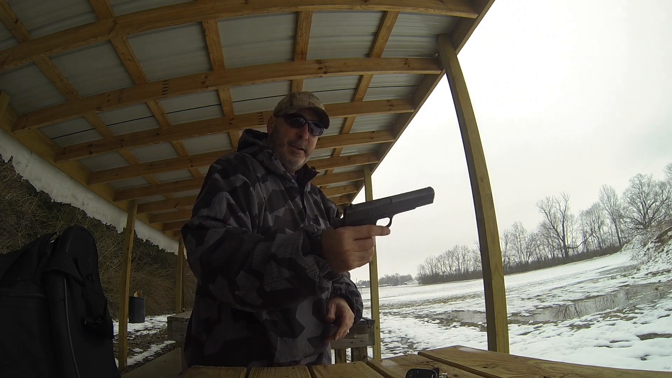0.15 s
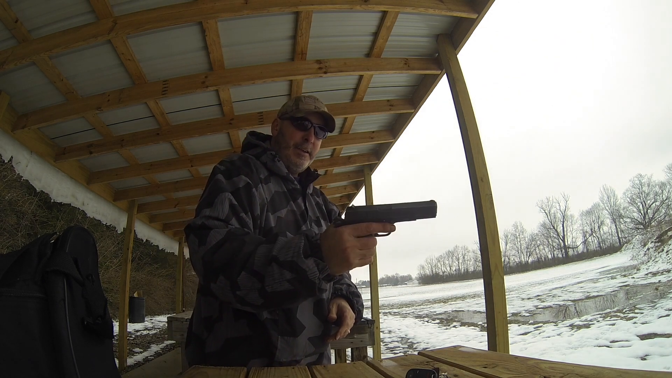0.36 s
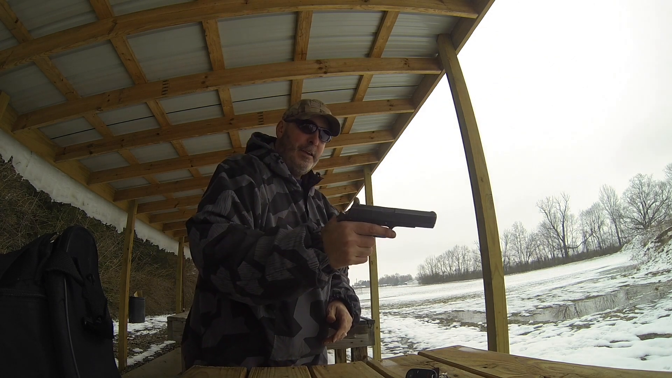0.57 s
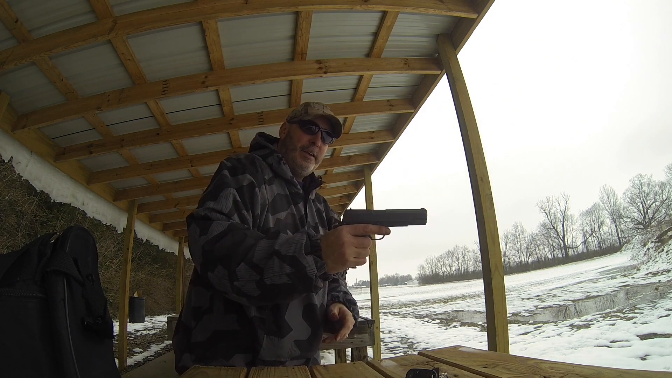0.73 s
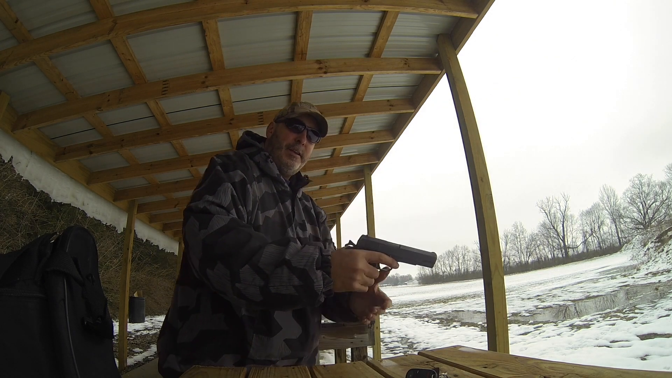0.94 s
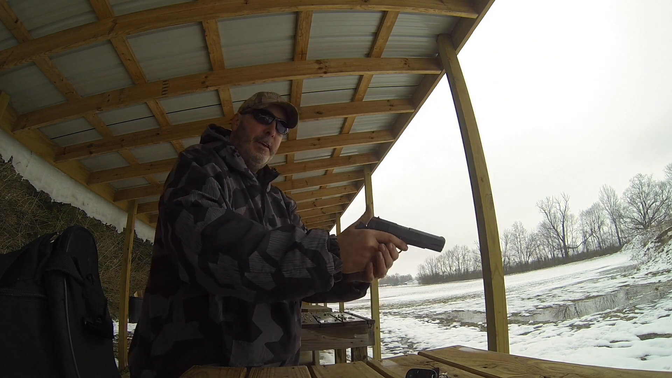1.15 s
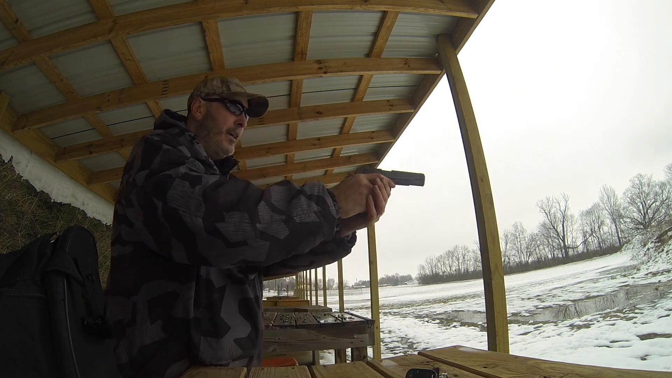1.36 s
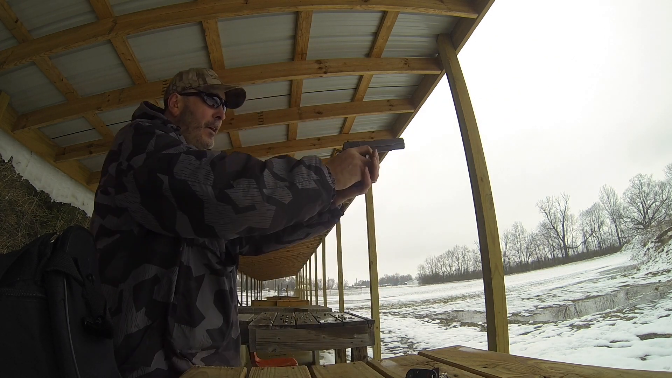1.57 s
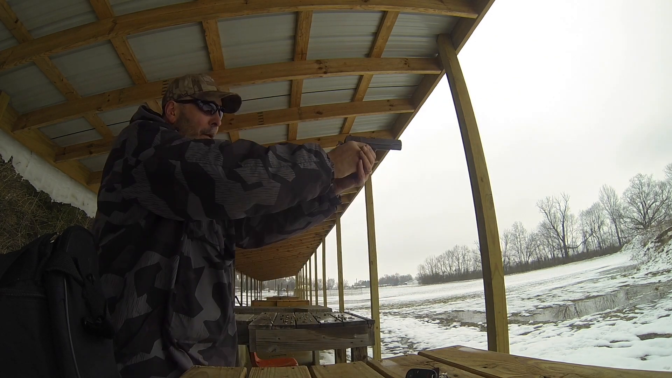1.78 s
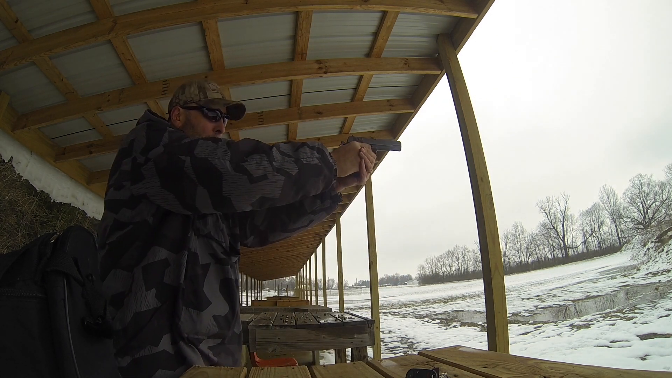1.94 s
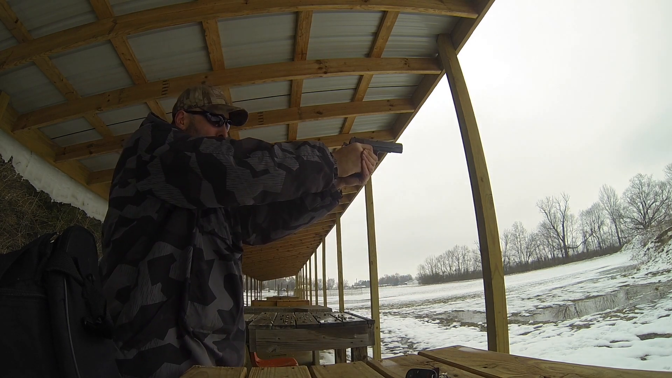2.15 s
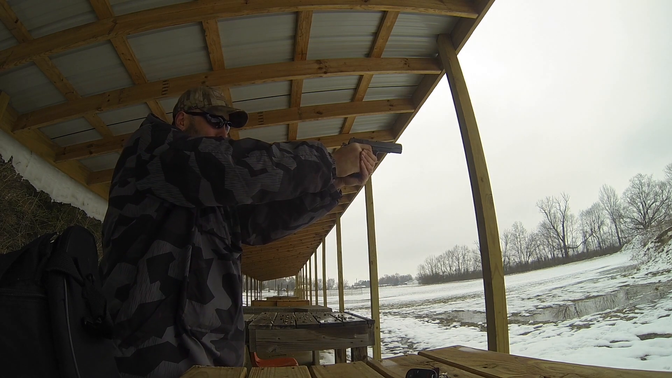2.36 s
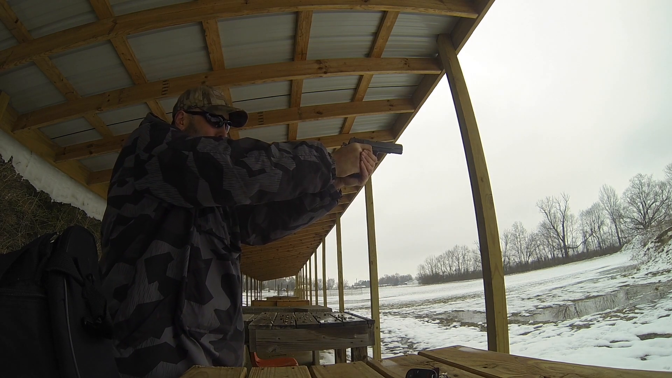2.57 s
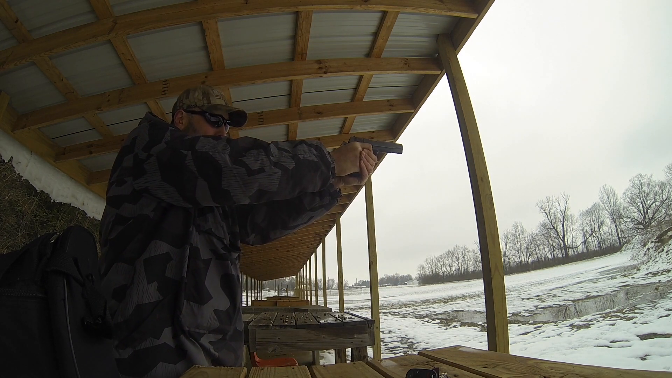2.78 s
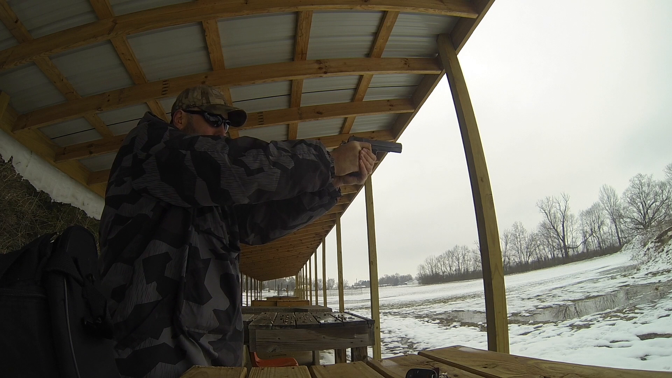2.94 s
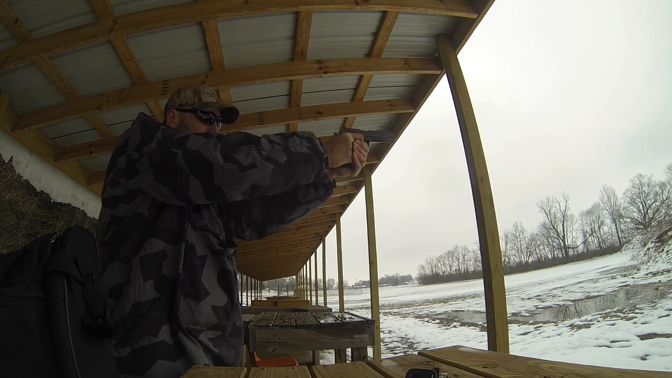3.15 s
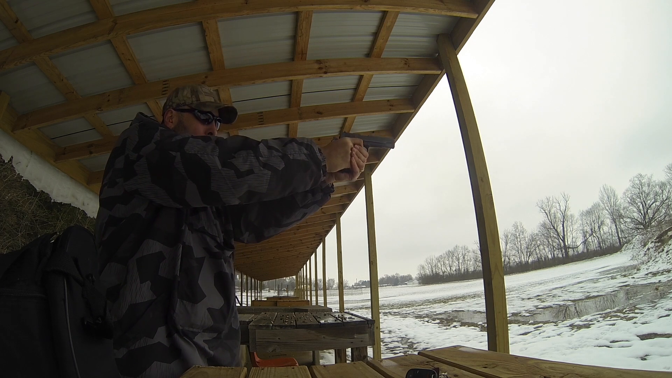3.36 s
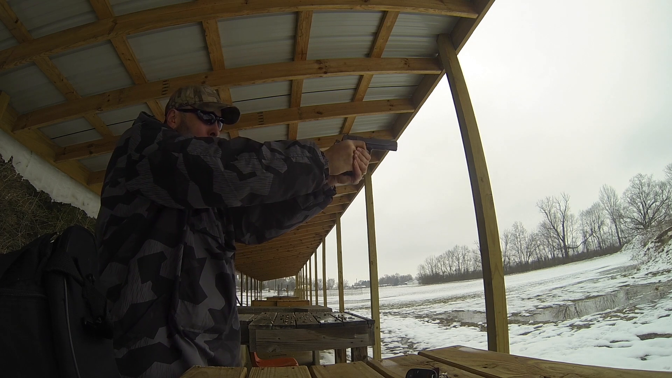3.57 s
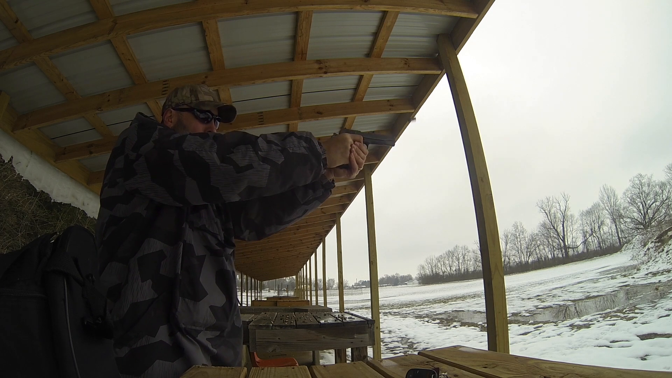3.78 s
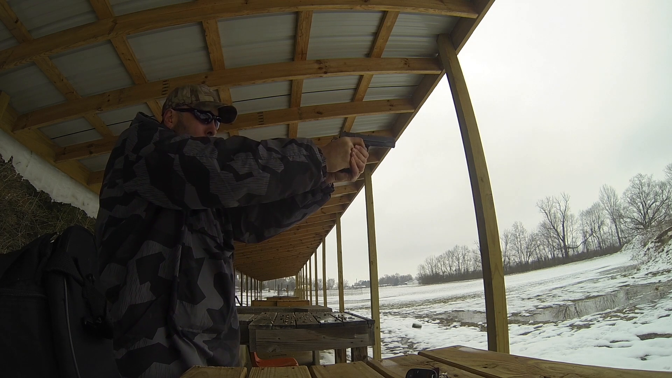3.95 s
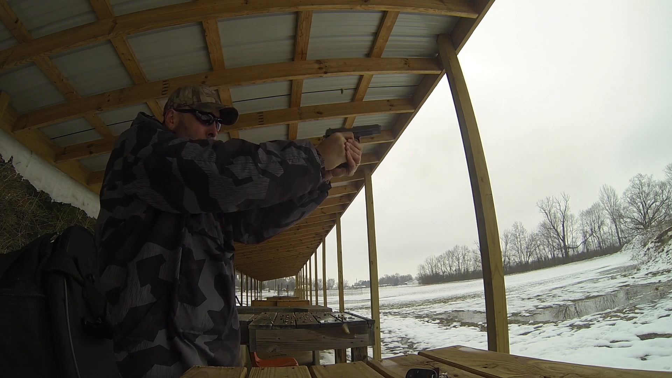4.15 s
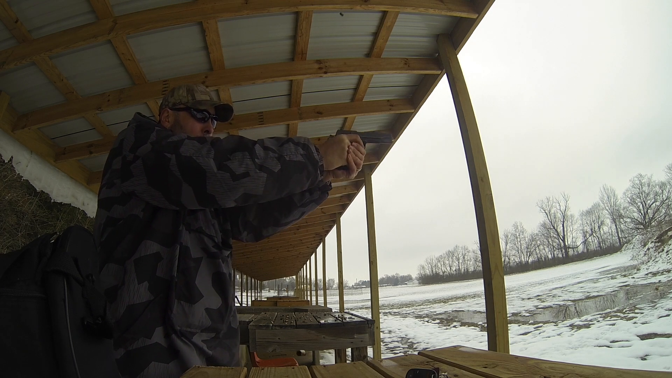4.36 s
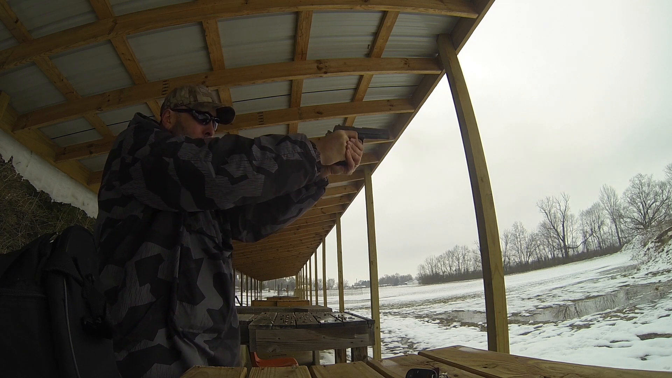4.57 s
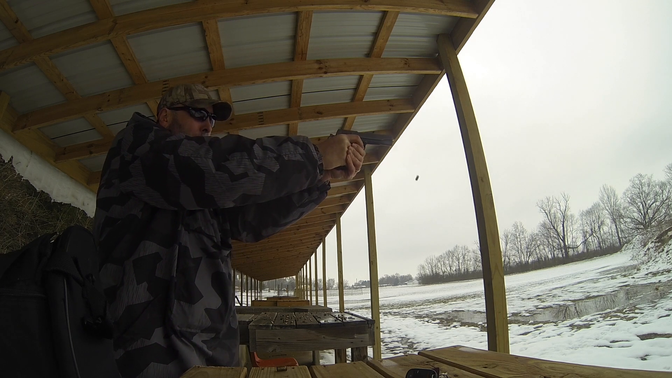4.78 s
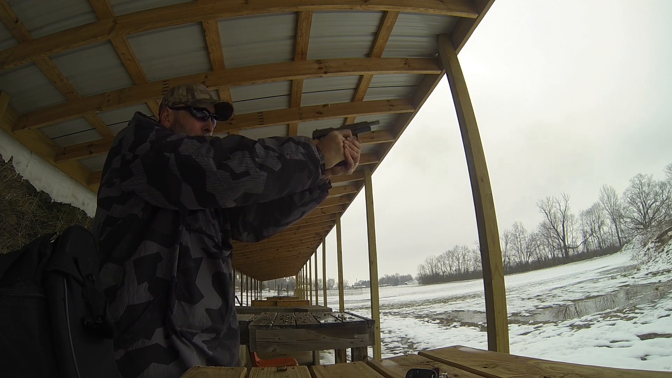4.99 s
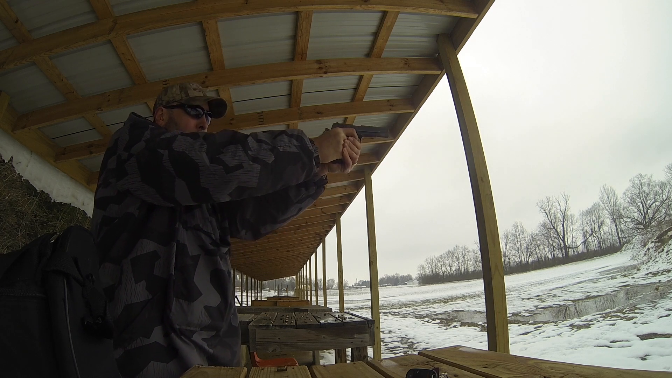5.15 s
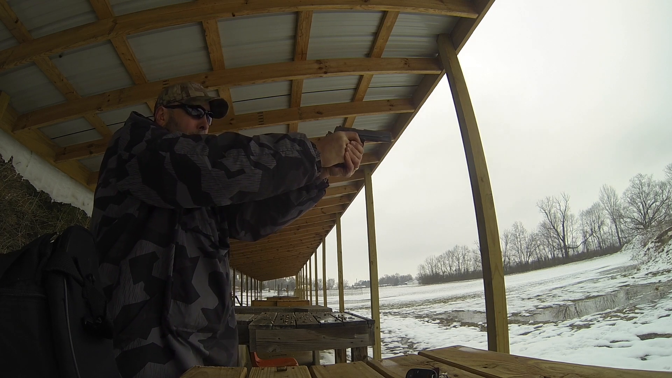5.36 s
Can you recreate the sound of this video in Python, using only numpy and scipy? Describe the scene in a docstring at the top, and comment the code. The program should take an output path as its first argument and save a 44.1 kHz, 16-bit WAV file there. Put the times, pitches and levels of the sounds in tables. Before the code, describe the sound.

A pistol's slide snaps shut with a steel clack, a small catch clicks, and a wooden bench takes a low bump. After a short pause, five loud shots follow in quick succession, each overloading the close microphone and echoing off a shelter roof and distant trees. Spent cases knock on the bench and tinkle faintly on the floor. A faint hiss and electronic ticking sit underneath.

```python
"""A pistol fires five shots under the wooden roof of a snowy outdoor range. First its slide clacks shut, a
catch clicks, the bench is bumped and sleeves rustle. Each blast rings and overloads a camera on the bench; the
shelter and the far trees echo it. Spent cases knock on the bench and tinkle on the floor. The shots make the
camera turn everything down, even its own hiss and whine and the steady ticking."""
import sys
import numpy as np
from scipy import signal
from scipy.fft import rfft, irfft, next_fast_len
from scipy.io import wavfile
from scipy.ndimage import uniform_filter1d, map_coordinates

SR = 44100
rng = np.random.default_rng(int(sys.argv[2]) if len(sys.argv) > 2 else 0)


def store_pcm(level_fs):
    """Save levels as 16-bit WAV."""
    pcm = np.round(np.clip(level_fs, -1, 1) * 32767).astype(np.int16)
    wavfile.write(sys.argv[1], SR, np.atleast_2d(pcm).T)


N = 239011
TIME = np.arange(N) / SR


def amp(db):
    """Turn decibels (dB) into a gain."""
    return 10 ** (np.asarray(db) / 20)


def unit(x):
    """Scale a sound to an average (rms) level of 1."""
    return x / np.sqrt(np.mean(x ** 2) + 1e-20)


def along(points, hz):
    """Read between (Hz, value) points on a log scale of pitch."""
    pitches, values = np.transpose(points)
    return np.interp(np.log(hz + 1), np.log(pitches + 1), values)


def filtered(x, response):
    """Multiply each frequency f in a sound by response(f)."""
    size = next_fast_len(len(x) + SR // 4)
    return irfft(rfft(x, size) * response(np.fft.rfftfreq(size, 1 / SR)), size)[:len(x)]


def resonances(table, f):
    """The response of an object that rings at the (Hz, width, dB) peaks given."""
    return sum(amp(db) * 1j * f * width / (hz * hz - f * f + 1j * f * width) for hz, width, db in table)


def noise(spectrum, size):
    """Noise of level 1, coloured by (Hz, dB) points."""
    return unit(filtered(rng.standard_normal(size), lambda f: amp(along(spectrum, f))))


def wobble(size, rate):
    """A smooth curve through `rate` random values a second."""
    return map_coordinates(rng.standard_normal(int(size * rate / SR) + 4), [np.arange(size) * rate / SR])


def fade(t, t60):
    """A gain that holds until time 0, then falls 60 dB every t60 seconds."""
    return amp(-60 * np.maximum(t, 0) / t60)


def add(track, start, sound):
    """Mix a sound into the track, `start` seconds in."""
    part = track[max(round(start * SR), 0):][:len(sound)]
    part += sound[:len(part)]


# The colour of the hiss. Each row: frequency in Hz, level in dB.
HISS = [(20, -3.5), (60, 0.5), (130, -6), (250, -11.5), (500, -17.5), (1000, -20.5), (2200, -24.5),
        (3000, -23), (4400, -30.5), (7500, -33.5), (11500, -38.5), (15000, -39.5)]
# Thin, steady tones. Each row: pitch in Hz, average level in dB.
WHINE = [(2589, -72.5), (10643, -86), (10691, -69), (13189, -86.5)]
def background():
    """Quiet air and hiss; the camera's electronics whine and chirp, and a faint tick repeats about ten times a
    second."""
    whine = sum(amp(db) * np.sqrt(2) * np.sin(2 * np.pi * hz * TIME) for hz, db in WHINE)
    chirps = np.zeros(N)
    for hz, db, lag in [(5020, -59.5, 0), (5490, -63, 0.32)]:
        pulse = np.cos(np.pi * (48 * TIME - lag)) ** 8  # the tones take turns, 48 times a second
        chirps += amp(db) * pulse * np.sin(2 * np.pi * hz * TIME + 2 * wobble(N, rate=99))
    tick_gap_s = .1024
    from_tick = (TIME - .0765 + tick_gap_s / 2) % tick_gap_s - tick_gap_s / 2
    ticks = -amp(-34) * np.exp(-np.abs(from_tick) / .0012)
    hiss = amp(-49.5) * filtered(noise(HISS, N), lambda f: f < 15300)
    return hiss + whine + chirps + ticks


def steel_snaps(contacts, body, echo_db, echo_t60, dull_hz):
    """Steel parts meet: a gritty burst rings the part and echoes off the roof."""
    out, t = np.zeros(N), TIME[:SR // 2]
    # small parts give off no bass, and the highest treble is soft
    band = lambda f: f ** 4 / (f ** 4 + 1300 ** 4) / (1 + (f / dull_hz) ** 8)
    for start, db, t60, tilt_db in contacts:
        colour = lambda f: resonances(body, f) * amp(tilt_db * np.log2(f + 1)) * band(f)
        grit = unit(filtered(rng.standard_normal(len(t)), colour))
        echo = amp(echo_db) * fade(t, echo_t60) * (1 - np.exp(-t / 0.0029))
        add(out, start, amp(db) * grit * np.hypot(fade(t, t60), echo))
    return out


# The slide's hits. Each row: start in seconds, level in dB, fade time in seconds,
# brightness in dB per octave.
SLIDE_HITS = [(.0025, -19, 0.039, -11.5), (.0112, -16, 0.081, -5), (.0195, -7.5, 0.033, -4),
              (.0305, -7, 0.064, -1.5)]
# How the slide rings. Each row: pitch in Hz, width in Hz, level in dB.
SLIDE_TONES = [(1664, 84, 1), (2430, 210, -4), (2680, 110, -2.5), (3200, 430, -0.5), (3860, 140, -8.5),
               (4640, 210, 4), (5060, 130, -4.5), (7100, 230, 4.5), (8270, 380, -10.5), (9450, 220, -6),
               (13200, 1100, -24.5)]
def slide():
    """The pistol's slide runs forward and slams shut."""
    return steel_snaps(SLIDE_HITS, SLIDE_TONES, echo_db=-11, echo_t60=0.17, dull_hz=14140)


# The catch's hits. Each row: start in seconds, level in dB, fade time in seconds,
# brightness in dB per octave.
CATCH_HITS = [(.5603, -21, 0.014, -2.5), (.5668, -40, .03, 7), (.6625, -45.5, 0.025, -5)]
# How the catch rings. Each row: pitch in Hz, width in Hz, level in dB.
CATCH_TONES = [(2730, 270, -6), (3160, 340, 3), (5130, 700, -6.5), (6780, 270, 3.5), (7100, 60, -6),
               (8550, 450, -21), (11000, 500, -12), (13400, 1000, -6)]
def catch():
    """A small steel catch clicks on the pistol."""
    return steel_snaps(CATCH_HITS, CATCH_TONES, echo_db=-20, echo_t60=0.14, dull_hz=15000)


SWAY_HZ, SWAY_T60 = 72.5, 0.44  # the bench's lowest note and its fade time in seconds
# How loose boards rattle. Each row: pitch in Hz, width in Hz, level in dB.
BOARD_TONES = [(1040, 50, 9), (1190, 60, 8.5), (1555, 93, 7.5), (1620, 33, -6)]
def bench_bump():
    """The bench sways more while it is pushed, then settles; loose boards buzz along."""
    start, push_s = 1.286, .05
    t = TIME - start
    growth_db = 14.5 * np.minimum(t / push_s - 1, 0)
    level = (t > 0) * amp(-19 + growth_db) * fade(t - push_s, SWAY_T60)
    sway = -np.sin(2 * np.pi * SWAY_HZ * t)
    colour = lambda f: resonances(BOARD_TONES, f) / np.sqrt(1 + (f / 7000) ** 4)
    boards = unit(filtered(rng.standard_normal(N), colour))
    buzz = amp(-33.5) * level ** 0.49  # fades about half as fast as the sway
    return level * sway + buzz * boards * (1 + 0.18 * sway)


# The colour of rubbing cloth. Each row: frequency in Hz, level in dB.
CLOTH = [(2000, -20), (6000, -4), (8500, -1), (11000, -8), (15000, -14)]
def sleeve_rustle():
    """Jacket sleeves brush faintly as the pistol is raised."""
    middle_s, spread_s = 1.426, 0.075
    stroke = np.exp(-.5 * ((TIME - middle_s) / spread_s) ** 2)
    return amp(-62.5 + 2.8 * wobble(N, rate=120)) * stroke * noise(CLOTH, N)


# The hollow ring of shelter and camera housing. Each row: pitch in Hz, width in Hz, level in dB.
HOLLOW_TONES = [(162, 3.5, -3), (237.5, 8.7, 8), (319, 14, 9), (443, 96, 6.5), (597, 30, -0.5),
                (885, 8.9, -8.5), (1026, 43, 2.5), (1230, 64, -3.5), (1447, 120, 18), (1534.4, 69, 22.5),
                (2530, 400, 3.5)]
def reflections(spectrum, size, air_db):
    """Many echoes blur into hollow noise; the air takes about air_db per second for each kHz."""
    # a dip lies just above the housing's ring
    hollow = lambda f: (1 + resonances(HOLLOW_TONES, f)) * (1 - resonances([(1975, 470, -10.5)], f))
    wash = filtered(noise(spectrum, size), hollow)
    steady = wash / np.sqrt(np.abs(uniform_filter1d(wash * wash, size=700)) + 1e-12)
    hz, t, bands = signal.stft(steady, SR, nperseg=256)
    khz = hz[:, None] / 1000
    loss_db = air_db * khz * (1 + (khz / 15) ** 6)  # the highest treble fades fastest
    return signal.istft(bands * amp(-loss_db * t), SR, nperseg=256)[1][:size]


def shelter_echo(t):
    """Echo strength: a blast slaps between bench and roof, then runs on until the roof ends."""
    slap = amp(3) * fade(t, t60=0.14)
    roof = amp(-15) * fade(t, t60=0.87) * fade(t - 0.17, t60=0.29)
    return np.hypot(slap, roof)


def tree_echo(t):
    """Echo strength: the far trees return one broad swell, and the land behind rolls on."""
    delay_s, spread_s, roll_start_s = 0.33, 0.086, 0.25
    trees = amp(-33.5) * np.exp(-.5 * ((t - delay_s) / spread_s) ** 2)
    roll = amp(-36) * fade(t - roll_start_s, t60=2.64) / (1 + np.exp((roll_start_s - t) / .03))
    return np.hypot(trees, roll)


# The colours of near and far echoes. Each row: frequency in Hz, level in dB.
NEAR_COLOUR = [(20, -3.5), (100, 3), (200, -3.5), (450, -2.5), (1000, -1), (2800, 0), (5000, -7),
               (8000, -13.5), (12000, -25), (16000, -37.5)]
FAR_COLOUR = [(20, 5.5), (190, -1), (450, -4), (1000, -4), (2700, -3.5), (4000, -11), (7000, -24),
              (14000, -43)]
# The shots. Each row: start in seconds, level in dB, shelter echo in dB, low thud in dB.
SHOTS = [(3.064, -0.5, 2, 5.5), (3.7006, -1, 1, -1), (4.1759, -1, 0, 2), (4.5722, -1, 0, -6.5),
         (5.0371, -1.5, 0, -1.5)]
def shots():
    """Each blast cracks, overloads the microphone, rings the camera housing and sets off echoes."""
    out, t = np.zeros(N), TIME[:SR * 5 // 4]
    crack_colour = [(300, 2.5), (1000, -2), (3000, 5.5), (6000, -7), (15000, -17.5)]
    for start, db, echo_db, thud_db in SHOTS:
        crack = amp(18.5) * fade(t, t60=0.0081) * noise(crack_colour, len(t))
        phase = 2 * np.pi * 1560 * t + .5 * wobble(len(t), rate=560)  # shaken, it rings unevenly
        housing = amp(18.5) * fade(t, t60=0.015) * np.sin(phase) * (1 - np.exp(-t / 0.00089))
        near = amp(echo_db) * shelter_echo(t) * reflections(NEAR_COLOUR, len(t), air_db=2.5)
        far = tree_echo(t) * reflections(FAR_COLOUR, len(t), air_db=1.5)
        thud_age = t / 0.0065  # a brief low thud as the blast overloads the microphone
        thud = amp(thud_db + 2) * (t > 0) * (1 - thud_age) * np.exp(-thud_age)
        thump_age = (t - .128) / 0.011  # a soft, very low thump follows
        thump = amp(-27) * thump_age * np.exp(-thump_age ** 2 / 2)
        add(out, start, amp(db) * (crack + housing + near + far + thud + thump))
    return out


# How the bench rings. Each row: pitch in Hz, level in dB, ring time as a multiple of the knock's.
BENCH_TONES = [(685, -22, 2.8), (1060, -6.5, 1.16), (1213, 0, 1.2), (1376, -7, 0.9), (1600, 4, 0.71),
               (1810, -16.5, 1.66), (2175, -10, 0.4), (2558, -8.5, 1.05), (2710, -6.5, 0.52),
               (4090, -11.5, 0.25)]
# Cases landing. Each row: start in seconds, level in dB, low-tone boost in dB, high-tone boost in dB.
KNOCKS = [(3.518, -24, -12.5, -16), (3.666, -27.5, -22, -20), (3.9574, -10.5, -11, -9),
          (3.9784, 0, 3.5, -20), (3.9814, 9, -6.5, -43), (3.9892, 6, -7.5, -44), (4.314, 9, -10, -5),
          (4.4632, -3.5, -5, 5.5), (4.531, -5, 8, 10.5), (4.7243, -9.5, -7.5, -22),
          (4.832, -4.5, -10.5, -24), (4.922, -31.5, 9.5, 9), (5.2492, -20.5, -7, -6),
          (5.323, -20, -16, -11)]
def case_knocks():
    """Spent cases hit the bench; each spot brings out its own tones, and the top sways after."""
    out, t = np.zeros(N), TIME[:SR // 2]
    rebound_s = 0.012  # the other end of the case lands just after
    for start, db, low_db, high_db in KNOCKS:
        t60 = 0.037 * np.exp(0.01 * db)  # harder landings ring a little longer
        spot = [(1215, low_db), (1550, 0), (1800, 0), (2300, high_db)]
        tones = [(hz * rng.normal(1, 0.0098), level + along(spot, hz), life)
                 for hz, level, life in BENCH_TONES]
        ring = sum(amp(level) * fade(t, t60 * life) * np.sin(2 * np.pi * (hz * t + rng.random()))
                   for hz, level, life in tones)
        # the rim chatters on the wood, blurring the same tones
        blurred = [(hz, 130, level) for hz, level, life in tones]
        wood = lambda f: resonances(blurred, f) / (1 + (f / 4200) ** 4)
        grit = unit(filtered(rng.standard_normal(len(t)), wood))
        rebound = (t > rebound_s) * amp(-28) * fade(t - rebound_s, t60)
        chatter = np.hypot(amp(-11) * fade(t, 0.69 * t60), rebound) * grit
        echo = amp(-34.5) * fade(t, t60=0.44) * reflections(NEAR_COLOUR, len(t), air_db=65.5)
        knock = amp(db) * (ring + chatter + echo) * (1 - np.exp(-t / 0.0017))
        phase = 2 * np.pi * SWAY_HZ * t + 0.92 * wobble(len(t), rate=27)
        sway = amp(-31 + 0.69 * db) * fade(t, SWAY_T60) * np.sin(phase) * (1 - np.exp(-t / 0.0061))
        add(out, start, knock + sway)
    return out


# Brass cases ringing. Each row: start in seconds, pitch in Hz, level in dB.
TINKLES = [(3.518, 7500, -60), (4.314, 7550, -48), (4.461, 10400, -41), (4.959, 10100, -59),
           (5.249, 7250, -58.5), (5.248, 11750, -50), (5.322, 11650, -59)]
def case_tinkles():
    """A brass case ticks on the floor and rings, wavering as it tumbles."""
    out, t = np.zeros(N), TIME[:SR // 2]
    tick_colour = [(500, -13), (2000, 10), (6000, -7.5), (13000, -27), (15000, -45)]
    for start, hz, db in TINKLES:
        t60 = .42 * (7500 / hz) ** 5.3  # higher notes die much sooner
        phase = 2 * np.pi * hz * t
        ring = np.sin(phase + .5 * wobble(len(t), rate=220)) + amp(-16) * np.sin(phase)
        tumble = amp(2.5 * wobble(len(t), rate=79)) * fade(t, t60)
        tick = amp(15.5) * fade(t, t60=0.08) * noise(tick_colour, len(t))
        add(out, start, amp(db) * (ring * tumble + tick) * (1 - np.exp(-t / 0.0008)))
    return out


def scene():
    """Mix it all; the firing is far louder than the handling before it."""
    firing = amp(10) * (shots() + case_knocks() + case_tinkles())
    handling = slide() + catch() + bench_bump() + sleeve_rustle()
    return (firing + handling + background())[None]


def gain_control(x, depth_db, attack_s, release_s):
    """Every overload turns the volume down; it creeps back slowly."""
    last_overload = np.maximum.accumulate(np.where(np.abs(x) > 2, TIME, -np.inf))
    held = np.exp((last_overload - TIME) / release_s)
    smoothing = np.exp(-1 / (attack_s * SR))
    return x * amp(-depth_db * signal.lfilter([1 - smoothing], [1, -smoothing], held))


def record(dry):
    """The camera turns itself down, flattens peaks at full scale and cuts the highest treble."""
    ducked = gain_control(dry[0], depth_db=11, attack_s=0.0029, release_s=11)
    clipped = ducked / (1 + np.abs(ducked) ** 12) ** (1 / 12)
    return filtered(clipped, lambda f: 1 / (1 + (f / 16400) ** 80))[None]


dry = scene()
out = record(dry)
store_pcm(out)
```